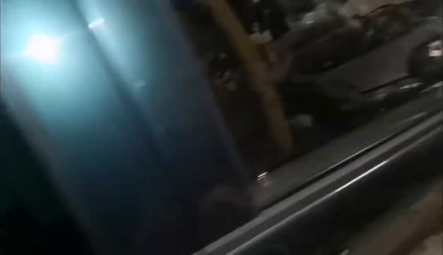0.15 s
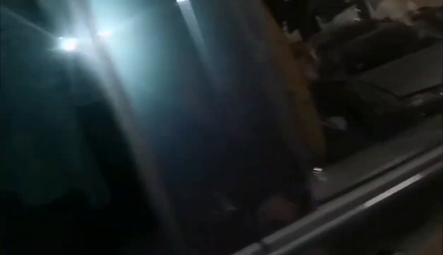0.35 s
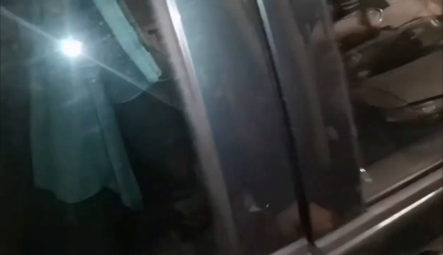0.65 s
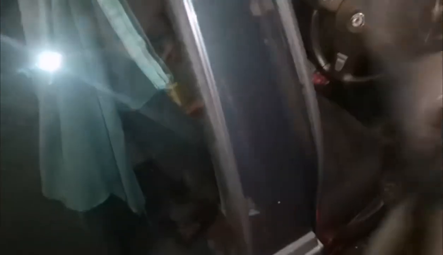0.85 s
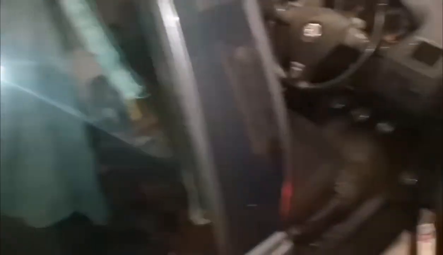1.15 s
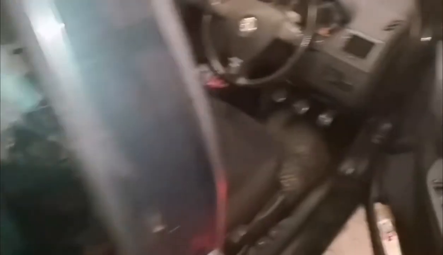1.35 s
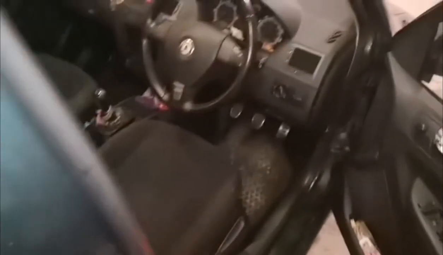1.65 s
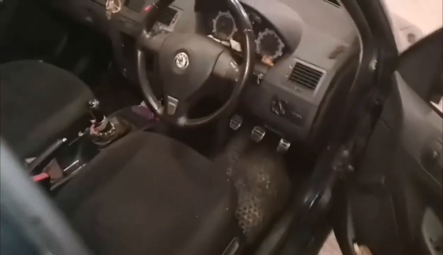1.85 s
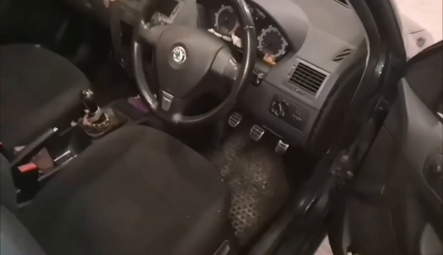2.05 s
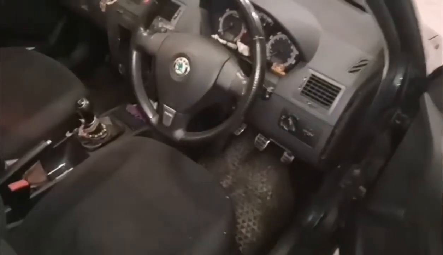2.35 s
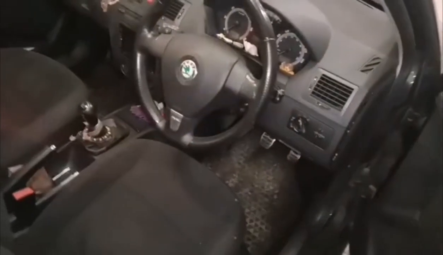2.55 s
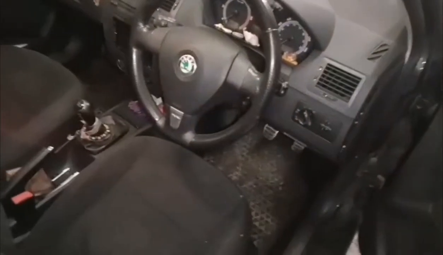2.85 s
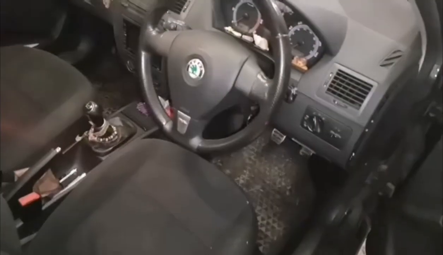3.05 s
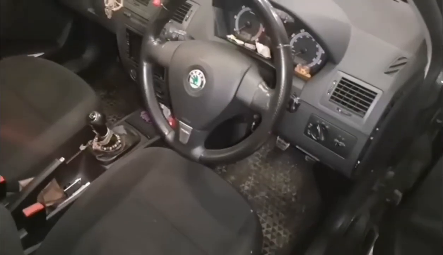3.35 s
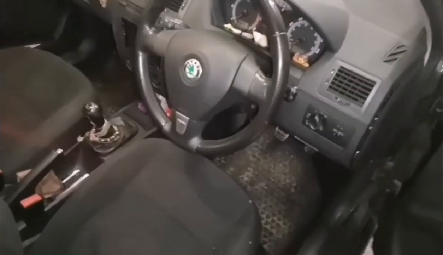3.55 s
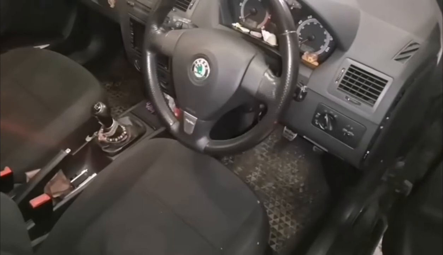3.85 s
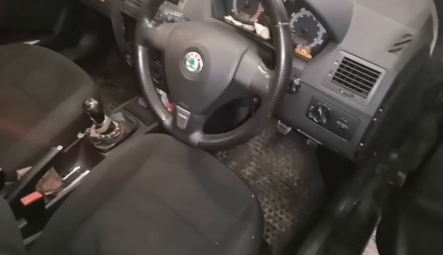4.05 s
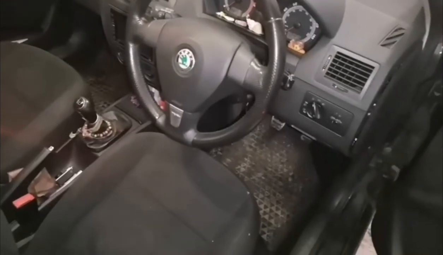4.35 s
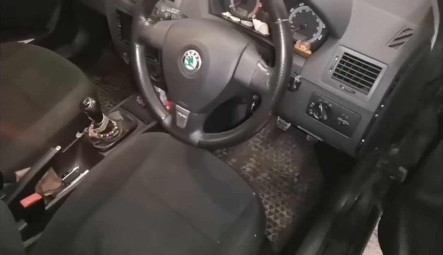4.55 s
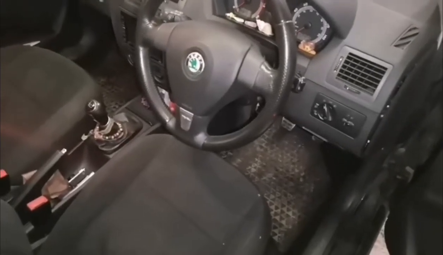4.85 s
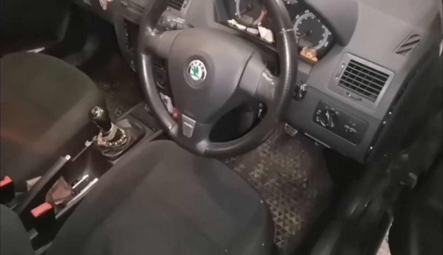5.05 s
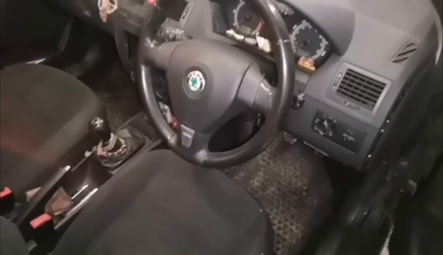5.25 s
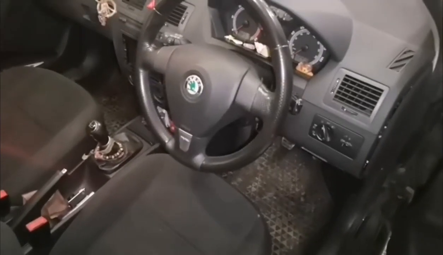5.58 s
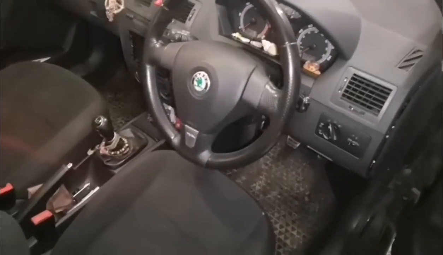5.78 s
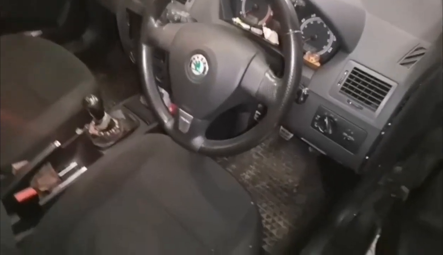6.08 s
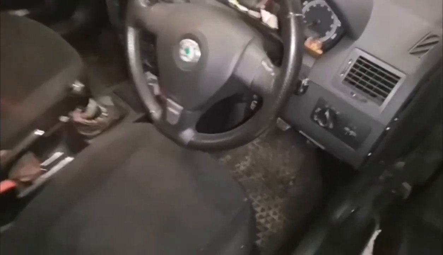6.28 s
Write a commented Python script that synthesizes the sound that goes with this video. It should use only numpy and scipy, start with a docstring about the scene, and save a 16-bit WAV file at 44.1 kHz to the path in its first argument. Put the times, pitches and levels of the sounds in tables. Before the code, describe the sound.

A handheld stereo microphone is in a quiet garage with faint rumble, hiss and short wall echoes. From the start keys jingle close by, with a small dry tick and knock at 0.1 s and bright ringing clinks until about 0.5 s. At 0.7-0.85 s the car door latch releases: a gritty clack and heavy, dull panel thump, peaking near 0.8 s, with a deep heave of cabin air and a rebound. Around 1.25 s the door stop knocks, less loudly. Soft clinks resume from 1.5 s, growing into denser jingling at 2.2-2.9 s, strongest near 2.6 s, with brief hissing cloth rubs around 2.35 and 2.9 s. Smaller jingles come at 3.4-3.6 s. Then it is almost silent, with faint plastic ticks near 4.1 s and 5.6-5.9 s. At 6.03 s one sharp, dry, loud snap rings briefly, followed by a few weak ticks.

```python
"""A bunch of keys is handled beside a car in a quiet garage: ringing clinks, dense jingling, hissing rubs on cloth.
The door latch lets go with a heavy thump and a rebound, and the door stop knocks: noise through latch resonances
over panel modes, with low heaves of the cabin air. Dry plastic ticks are noise bursts; late on something small snaps.
Two microphone ports a hand apart hear it, with random-sign wall echoes and a faint rumble and hiss."""
import sys
import numpy as np
from scipy import signal
from scipy.fft import rfft, irfft, next_fast_len
from scipy.io import wavfile
from scipy.ndimage import uniform_filter1d

SR = 44100
rng = np.random.default_rng(int(sys.argv[2]) if len(sys.argv) > 2 else 0)


def store_wav(level_fs):
    """Save 16-bit WAV to argv[1]."""
    pcm = np.round(np.clip(np.atleast_2d(level_fs), -1, 1) * 32767)
    wavfile.write(sys.argv[1], SR, pcm.T.astype(np.int16))


N = 283122

# Table levels are relative: the functions add fixed trims. Positive pan is left.

# background spectrum: (frequency [Hz], relative density [dB])
HUSH_SPECTRUM = [(8.8, -23.5), (15, 2), (126, -17.5), (169, -20), (201, -17), (294, -29), (726, -30),
                 (840, -31), (1130, -32.5), (1230, -34.5), (1790, -28.5), (3120, -36), (3940, -40.5),
                 (13400, -46.5), (16000, -50.5)]
# background likeness of the ports: (frequency [Hz], left-right correlation [-1..1])
PORT_LIKENESS = [(60, 1), (180, 0.31), (550, -0.65), (1650, -0.35), (4970, 0.18), (15000, 0.85)]
# wall echoes: (frequency [Hz], t60 [s])
GARAGE_DECAY = [(100, 0.57), (300, 0.73), (1000, 0.62), (3000, 0.54), (8000, 0.5), (14000, 0.22)]
# pushes on the cabin air: (crest time [s], level [dB], pitch [Hz], t60 [s])
HEAVES = [(0.814, -15, 37.8, 0.34), (1.048, -32, 30.8, 0.48), (1.169, -52.5, 32, 0.27),
          (1.299, -39.5, 37.8, 1.2), (1.409, -44, 30.7, 0.11), (1.508, -41, 26, 0.6),
          (1.623, -35, 42.5, 0.14), (1.791, -52.5, 40, 0.76), (1.96, -56, 39.7, 1.7)]
# blows in the door: (time [s], crack level [dB], panel level [dB], treble against crack [dB], crack length [s])
BLOWS = [(0.104, -27, -41.5, -2.5, 0.0076), (.719, -43, -32.5, -0.5, 0.046), (0.7348, -36, -39, 3.5, 0.026),
         (0.783, -30.5, -31.5, -10, 0.021), (0.7935, -13, -12.5, -9.5, 0.017),
         (.852, -17.5, -23.5, -24, 0.01367), (1.238, -41, -54.5, 9, 0.035), (1.255, -17.5, -31.5, 3, 0.013),
         (1.263, -26, -14, 10, 0.013), (2.356, -43.5, -36, -11, 0.062), (2.982, -45, -51.5, -28, 0.033),
         (3.482, -56.5, -52.5, -18, 0.018), (5.853, -52.5, -59, -18, .013)]
# latch resonances: (frequency [Hz], width of each of two passes [Hz], level [dB])
LATCH_PEAKS = [(1077, 440, -6), (1335, 370, -5.5), (1490, 380, -3.5), (1630, 220, 1), (2014, 83, -5),
               (2920, 150, -9)]
# door panel modes: (frequency [Hz], level [dB], t60 [s])
PANEL_MODES = [(86, -9, 0.11), (124, -5.5, 0.093), (159.4, 1, 0.16), (201.2, -7, 0.33), (254.6, -3.5, 0.15),
               (293.6, -5, 0.11), (412.1, -6.5, 0.08), (551, -13, 0.091), (753, -13.5, .12)]
# loose trim spectrum: (frequency [Hz], relative density [dB])
TRIM_SPECTRUM = [(150, -30), (400, 1.5), (1200, 0), (2200, -2.5), (4000, -9.5), (9000, -15), (12000, -34)]
# plastic ticks and the snap: (time [s], level [dB], low ring [Hz], high ring [Hz], high against low [dB])
TICKS = [(0.1032, -20, 1790, 7630, -8), (2.357, -49.5, 2020, 8130, -1), (3.817, -58, 2200, 7500, 2),
         (4.0174, -56, 2040, 8810, -11), (4.093, -38.5, 3217, 10600, -3.5), (4.149, -38.5, 1980, 8570, -2),
         (4.2387, -60, 2180, 7870, -6), (5.6331, -52, 1738, 8200, 1), (5.677, -60.5, 1700, 7400, -12),
         (5.836, -59.5, 2540, 7390, -8.5), (5.858, -49, 1697, 7220, 1), (5.893, -55.5, 3000, 6960, -16.5),
         (5.9866, -52, 2150, 7930, 11.5), (6.0307, -4, 3320, 8970, -3), (6.2472, -61.5, 2300, 7640, -10),
         (6.2912, -63, 3530, 7670, -2.5), (6.323, -44.5, 3380, 5600, -14.5), (6.3977, -37.5, 4300, 6100, 4)]
# tick and snap burst spectrum: (frequency [Hz], relative density [dB])
SNAP_SPECTRUM = [(140, -69), (240, -42), (945, -20), (1660, -9), (2320, -12), (3290, -5), (4700, -4),
                 (7300, -4), (8960, -3), (13900, -20), (16000, -42)]
# keys and hand on cloth: (start [s], level [dB], rise [s], hold [s], bass against level [dB])
RUBS = [(2.342, -35, 0.015, 0.044, -12), (2.851, -39, 0.091, 0.1, -23.5), (5.537, -78.5, 0.054, .37, -15),
        (6.278, -68.5, 0.0096, 0.16, -22.5)]
# cloth hiss spectrum: (frequency [Hz], relative density [dB])
CLOTH_SPECTRUM = [(290, -40), (500, -14.5), (988, 1.5), (1180, -3.5), (1950, 8), (2430, 5.5), (3440, -1),
                  (7860, 9.5), (10500, -0.5), (14900, -9.5), (16000, -42)]
# swings of the bunch: (start [s], level [dB], rise [s], hold [s], t60 [s], treble against level [dB], pan [dB])
SHAKES = [(-.1, -40.5, 0.14, 0.13, 0.27, -22, -4), (0.066, -34.5, 0.039, 0.06, 1, -11.5, 8.5),
          (0.379, -53.5, 0.005, 0.015, 1, -21, 8), (1.52, -52, 0.028, 0.21, 0.25, -8, 1.5),
          (1.841, -41.5, 0.013, 0.0074, 0.48, 4, -1.5), (2.211, -41, 0.059, 0.0083, 0.57, 0, 4),
          (2.41, -46.5, .012, 0.009, 1, -13, -1.5), (2.538, -37.5, 0.063, .25, 0.17, -8, 2.5),
          (2.799, -34, 0.024, .005, 0.052, 2, 1), (3.247, -51, .12, 0.0086, 0.047, -10, 1),
          (3.402, -43, 0.038, 0.15, 0.22, -12, 3.5), (3.926, -60.5, 0.073, .01, 0.18, -17, 5)]
# resonances heard when keys ring, with a short-lived cluster near 7.2 kHz that is probably the microphone's:
# (frequency [Hz], level [dB], t60 before any extra damping [s])
RESONANCES = [(2020, -14, .06), (3550, -18, .08), (4130, -22, .3), (4920, -20, .4), (5450, -16, .12),
              (6105, -12, .15), (6325, -12, .8), (6660, -10, .2), (7106, -2, .14), (7214, 0, .25),
              (7310, -2, .12), (7434, -5, .2), (7700, -8, .15), (7950, -9, .15), (8398, -8, .35),
              (8580, -10, .5), (8963, -12, .15), (9600, -12, .2), (10090, -12, .25), (10780, -10, .22),
              (11160, -10, .15), (11422, -6, .45), (12100, -8, .22), (13080, -10, .24), (13530, -14, .3),
              (13935, -10, .45), (14350, -10, .4), (14850, -6, .1)]
# key contact noise spectrum: (frequency [Hz], relative density [dB])
CONTACT_SPECTRUM = [(350, -77), (600, -46.5), (1410, -22), (1880, -6), (4400, -19.5), (6550, -5.5),
                    (7210, -5.5), (7830, -6), (10000, -19.5), (11800, -19.5), (13900, -23), (15400, -17),
                    (16000, -24.5)]
# key on key: (time [s], level [dB], loudest low resonance [Hz], loudest high resonance [Hz],
#              high against low [dB], free ring until damped [s])
CLINKS = [(0.0269, -39, 7950, 9600, -12, 0.023), (0.079, -41, 7434, 10780, 0, .1),
          (0.1042, -28.5, 7106, 14350, 1, .13), (0.124, -28.5, 7434, 14850, -11, 0.11),
          (.1354, -18, 7214, 9600, -11, .3), (0.189, -31, 7310, 12100, -6, .12),
          (0.2204, -32.5, 7214, 9600, -20, 0.1), (0.2627, -32.5, 7214, 11422, -7, 0.04),
          (0.2887, -39.5, 7214, 11422, -25, 0.098), (.398, -28.5, 7310, 9600, -19, 0.072),
          (0.4043, -29, 7434, 9600, -23, 0.042), (0.4392, -28, 7106, 10090, -14, 0.079),
          (0.4873, -33, 7214, 9600, -25, 0.15), (0.508, -39, 7214, 10090, -21, .07),
          (1.5372, -43.5, 7106, 11422, 2.5, 0.087), (1.574, -44, 7214, 11422, -2.5, 0.025),
          (1.687, -39.5, 8963, 10090, -2.5, 0.031), (1.72, -29, 7310, 10090, -6.5, 0.015),
          (1.806, -47, 7310, 14850, -11, .07), (1.8488, -38, 8580, 11422, -1, 0.13),
          (1.8769, -36.5, 6660, 11422, 0, 0.12), (1.862, -46, 4920, 10780, -4, 0.33),
          (1.9227, -44.5, 7310, 11422, 4, 0.086), (2.0045, -46.5, 7310, 11422, -4, 0.092),
          (2.0966, -62.5, 7310, 11422, -1, 0.13), (2.176, -44, 7434, 12100, -8.5, 0.14),
          (2.24, -49.5, 4920, 13080, 11, 0.14), (2.2459, -36, 6660, 14350, 11, 0.068),
          (2.2636, -27, 8398, 14350, -0.5, .28), (2.4224, -34.5, 7310, 11422, -29, .07),
          (2.4907, -39.5, 7106, 14850, -1.5, .04), (2.573, -31, 7310, 9600, -9, .07),
          (2.614, -20, 7106, 14850, -3, .14), (2.6311, -21, 7310, 14850, 7, 0.015),
          (2.7014, -38.5, 7950, 11422, 11, 0.34), (2.7261, -26.5, 7310, 11422, -28, 0.085),
          (2.7387, -32.5, 8398, 13935, -20, 0.032), (2.7534, -31.5, 6325, 13935, 3, 0.094),
          (2.8255, -41.5, 6325, 10780, 20, 0.016), (2.902, -44, 7106, 12100, 9, 0.11),
          (3.3, -60, 3550, 11422, -2, 0.048), (3.365, -51, 7310, 12100, -22, 0.1),
          (3.409, -49, 7106, 9600, -27, 0.11), (3.444, -31, 7106, 10090, -5.5, .1),
          (3.4586, -35.5, 7106, 13080, -3, .08), (3.497, -43, 2020, 13935, -13, .09),
          (3.528, -38, 6325, 11422, 2.5, 0.025), (3.5747, -49.5, 5450, 13935, 3, 0.027),
          (3.6025, -39, 8580, 10780, 0.5, 0.027), (3.6177, -51, 8580, 10780, -10, 0.083),
          (3.9762, -56.5, 7434, 11422, -25, 0.11)]

HUSH_DB, PATCHY_DB = -64, 1.4
HEAVE_RISE_S = 0.03
PANEL_SPREAD_DB = 2.5  # random spread of the panel mode levels from blow to blow
DOOR_PAN_DB, TICKS_PAN_DB, TREBLE_PAN_DB = 0, 1.5, -5.5
RATTLE_DB = -29.5  # rattle behind a 0 dB tick
RATTLE_SLOPE = 0.36  # dB the rattle gains on its tick per dB the tick is weaker
LIFT_T60_S, SCRAPE_T60_S = 0.041, 0.045
SPLIT_HZ, HIGH_RINGS_HZ, EDGE_HZ = 9000, 9300, 15900
DAMPED_SAMPLES, CONTACT_SAMPLES = 6000, 2048
LAG_SAMPLES = 14  # left port after right


def amp(db):
    """Decibels to gain."""
    return 10 ** (np.asarray(db) / 20)


def evened(x):
    """Scales to rms 1."""
    return x / np.sqrt(np.mean(x ** 2) + 1e-20)


def read(points, hz):
    """Reads a frequency table at hz, interpolating over log frequency."""
    f, value = np.transpose(points)
    return np.interp(np.log(hz + 1), np.log(f + 1), value)


def tinted(x, points):
    """Filters x by a spectrum table; white noise of rms 1 keeps about that rms."""
    size = next_fast_len(x.shape[-1])
    gain = amp(read(points, np.fft.rfftfreq(size, 1 / SR)))
    return irfft(rfft(x, size) * evened(gain), size)[..., :x.shape[-1]]


def band(x, lo_hz, hi_hz):
    """Band-pass to rms 1."""
    sos = signal.butter(4, [lo_hz, hi_hz], "band", fs=SR, output="sos")
    return evened(signal.sosfilt(sos, x))


def split(x, hz):
    """The parts of x below and above hz."""
    low = signal.sosfiltfilt(signal.butter(4, hz, fs=SR, output="sos"), x)
    return low, x - low


def resonate(x, hz, width_hz):
    """A steep resonance: one peak filter passed twice."""
    peak = signal.iirpeak(hz, hz / width_hz, SR)
    return signal.lfilter(*peak, signal.lfilter(*peak, x))


def rings(modes, seconds):
    """One exponentially dying sine per mode, t60 held to 0.01-0.8 s."""
    t = np.arange(round(seconds * SR)) / SR
    hz, db, t60 = np.transpose(modes)[:, :, None]
    return t, amp(db - 60 * t / np.clip(t60, .01, .8)) * np.sin(2 * np.pi * hz * t)


def swell(start, rise, hold, t60):
    """Gain at every sample: enters at -30 dB, climbs to 0 dB, holds, dies away."""
    t = np.arange(N) / SR - start
    climb_db = -30 * np.clip(1 - t / max(rise, .002), 0, 1)
    fall_db = -60 * np.maximum(t - rise - hold, 0) / max(t60, .01)
    return (t > 0) * amp(climb_db + fall_db)


def sides(pan_db):
    """Left and right gains."""
    return amp(np.array([pan_db / 2, -pan_db / 2]))


def add(mix, s, sound):
    """Mixes a stereo sound in at time s."""
    part = mix[:, round(s * SR):][:, :sound.shape[1]]
    part += sound[:, :part.shape[1]]


def hush():
    """Distant rumble and hiss: shaped noise, gently patchy in time and pitch, part-correlated between ports."""
    frames, hz = N // 256 + 5, np.fft.rfftfreq(1024, 1 / SR)
    a, b, c, d, patches = rng.standard_normal((frames, 513, 5)).T
    patches = evened(uniform_filter1d(uniform_filter1d(patches, 14, 0), 10, 1))
    same = np.clip(read(PORT_LIKENESS, hz), -1, 1)[:, None]
    left, other = a + 1j * b, c + 1j * d
    spectra = np.array([left, same * left + np.sqrt(1 - same ** 2) * other])
    spectra *= amp(read(HUSH_SPECTRUM, hz)[:, None] + PATCHY_DB * patches)
    noise = signal.istft(spectra, nperseg=1024, noverlap=768)[1][:, :N]
    return amp(HUSH_DB) * evened(noise)


def garage(x):
    """Wall echoes of random sign, each band dying at its own speed."""
    taps = np.zeros((2, SR))
    at = np.arange(300, SR - 20, 20) + rng.integers(0, 20, (2, (SR - 301) // 20))
    np.put_along_axis(taps, at, rng.choice([-1., 1.], at.shape), 1)
    hz, t, z = signal.stft(taps, SR, nperseg=256)
    decay = amp(-60 * t / read(GARAGE_DECAY, hz)[:, None])
    tail = signal.istft(z * decay, SR, nperseg=256)[1]
    low = signal.lfilter(*signal.butter(2, 350, fs=SR), tail)
    tail = tail - low + low[0]  # long waves reach both ports alike
    return signal.fftconvolve(x, tail / np.linalg.norm(tail[0]), axes=1)[:, :N]


def boom():
    """Cabin air heaves at a low pitch while the door swings; weaker pushes are less tonal, more buffeting."""
    t, out = np.arange(N) / SR, np.zeros(N)
    buffet = band(rng.standard_normal(N), 25, 110)
    for crest, db, hz, t60 in HEAVES:
        tuned = np.clip((db + 56) / 18, 0, .93)
        tone = np.sqrt(2) * np.cos(2 * np.pi * hz * (t - crest))
        push = amp(db) * swell(crest - HEAVE_RISE_S, HEAVE_RISE_S, .02, t60)
        out += push * (tuned * tone + np.sqrt(1 - tuned ** 2) * buffet)
    return out * np.ones((2, 1))


def door():
    """Each blow grinds through the latch for some ms, spits a little treble and sets the panel ringing."""
    t, panel = rings(PANEL_MODES, .5)
    panel = panel * (1 - np.exp(-t / 0.0038))  # the big sheet takes a moment to move
    out = np.zeros((2, N))
    chance = rng.standard_normal((len(BLOWS), len(PANEL_MODES)))
    noise = rng.standard_normal((len(BLOWS), 3, len(t)))
    for (s, db, panel_db, treble_db, length), luck, n in zip(BLOWS, chance, noise):
        progress = np.minimum(t / length, 1)
        blow = np.sin(np.pi * progress ** .6)
        drive = (n[0] + 1.3 * n[1:]) * blow  # a wide source: the ports hear it only partly alike
        metal = sum(amp(d) * resonate(drive, hz, width) for hz, width, d in LATCH_PEAKS)
        hiss = amp(-8.5) * band(n[1:], 350, 4500) + amp(treble_db - 7.5) * band(n[1:], 2800, 9500)
        # loose trim rattles on
        trim = amp(-20.5 - 60 * t / 0.43) * progress * tinted(n[:0:-1], TRIM_SPECTRUM)
        crack = amp(10) * metal + hiss * blow + trim
        flutter = 1 + .5 * band(n[0], 13, 120)  # loose parts
        body = amp(panel_db - 2.5) * amp(PANEL_SPREAD_DB * luck) @ panel * flutter
        add(out, s, amp(db) * sides(DOOR_PAN_DB)[:, None] * crack + body)
    return out


def ticks():
    """Ticks and snap: a noise burst of 8 ms t60 with two short rings and a rattle behind."""
    out = np.zeros((2, N))
    noise = tinted(rng.standard_normal((len(TICKS), 3, 4096)), SNAP_SPECTRUM)
    for (s, db, low_hz, high_hz, high_db), n in zip(TICKS, noise):
        t, ring = rings([(low_hz, -9, .01), (high_hz, high_db - 3.0, .01)], 4096 / SR)
        snap = amp(-2 - 60 * t / .008)
        rattle = amp(RATTLE_DB - RATTLE_SLOPE * db - 60 * t / .09)
        burst = (n[0] + 1.1 * n[1:]) * (snap + rattle)
        onset = 1 - np.exp(-(t / .0008) ** 3)
        add(out, s, amp(db) * sides(TICKS_PAN_DB)[:, None] * (ring.sum(0) + burst) * onset)
    return out


def rubs():
    """Threads slip in a dense, slightly grainy hiss over a low push."""
    grain = amp(2.5 * evened(uniform_filter1d(rng.standard_normal(N), 160)))
    shared, apart = rng.standard_normal(N), rng.standard_normal((2, N))
    hiss = evened(tinted(shared + 1.2 * apart, CLOTH_SPECTRUM) * grain)
    push = band(rng.standard_normal(N), 140, 310)
    out = np.zeros((2, N))
    for start, db, rise, hold, bass_db in RUBS:
        out += swell(start, rise, hold, LIFT_T60_S) * amp(db) * (hiss + amp(bass_db) * push)
    return out


def jingle():
    """About 800 tiny ticking contacts a second; about half of them set a short resonance ringing."""
    t, ring = rings([(hz, db, min(.6 * t60, .08)) for hz, db, t60 in RESONANCES], .12)
    hits = rng.random(N) < 800 / SR
    size = amp(3.6 * np.minimum(rng.exponential(1, N), 3)) * hits
    which = rng.integers(0, 2 * len(RESONANCES), N)  # the upper half of the numbers rings nothing
    tones = sum(signal.oaconvolve(size * (which == k), ring[k])[:N] for k in range(len(RESONANCES)))

    spread = np.sqrt(signal.lfilter([1], [1, -np.exp(-1 / (0.002 * SR))], size ** 2))
    noise = rng.standard_normal(N) + 1.1 * rng.standard_normal((2, N))
    contacts = tinted(noise, CONTACT_SPECTRUM) * spread
    dull, bright = split(evened(tones) + amp(-2) * evened(contacts), SPLIT_HZ)

    level, treble = np.zeros(N), np.zeros(N)
    for start, db, rise, hold, t60, treble_db, pan_db in SHAKES:
        shake = amp(db - 7.5) * swell(start, rise, hold, t60)
        level += shake
        treble += amp(treble_db) * shake
    return level * evened(dull) + treble * evened(bright)


def clinks():
    """Each contact scrapes in, rings two resonances freely until damped, and rattles all of them, dying sooner."""
    t, ring = rings([(hz, 0, t60) for hz, db, t60 in RESONANCES], .35)
    hz, ring_db, t60 = np.transpose(RESONANCES)
    out = np.zeros((2, N))
    chance = rng.standard_normal((len(CLINKS), 4, len(RESONANCES)))
    contact = tinted(rng.standard_normal((len(CLINKS), CONTACT_SAMPLES)), CONTACT_SPECTRUM)
    dull, bright = split(contact, SPLIT_HZ)
    # touching neighbours make the ring flutter
    rattles = uniform_filter1d(rng.standard_normal((len(CLINKS), DAMPED_SAMPLES)), 180)
    onset = 1 - np.exp(-(t / .002) ** 2)
    scrape_db = -8 - 60 * t[:CONTACT_SAMPLES] / SCRAPE_T60_S
    for clink, luck, low, high, rattle in zip(CLINKS, chance, dull, bright, rattles):
        s, db, low_hz, high_hz, high_db, free_s = clink
        loose = np.zeros(len(RESONANCES))
        loose[np.argmin(abs(hz - low_hz))] = amp(-3)
        loose[np.argmin(abs(hz - high_hz))] = amp(-6.5 + high_db)
        port_gain = amp(3.5 * luck[1:3])  # random for each resonance and port
        damping = np.exp(-(t / max(free_s, .005)) ** 3) * (.5 + .5 * amp(-60 * t / .08))
        sound = (loose * port_gain) @ ring * damping

        # the damped ring varies randomly in pitch and level and dies sooner
        damped_modes = np.transpose([hz * (1 + .007 * luck[3]), ring_db + 4 * luck[0], 1 / (1 / t60 + 1 / .16)])
        damped_gain = port_gain * amp(-13 + high_db * (hz > HIGH_RINGS_HZ))
        damped = damped_gain @ rings(damped_modes, DAMPED_SAMPLES / SR)[1]
        sound[:, :DAMPED_SAMPLES] += damped * (1 + .6 * evened(rattle))
        sound[:, :CONTACT_SAMPLES] += amp(scrape_db) * (low + amp(7.5 + high_db) * high)
        add(out, s - .0005, amp(db) * sound * onset)
    return out


def dangling(keys):
    """The bunch drifts between the ports from swing to swing; its treble leans steadily right."""
    dull, bright = split(keys, SPLIT_HZ)
    swings = np.transpose(SHAKES)
    pan_db = np.interp(np.arange(N) / SR, swings[0] + swings[2], swings[-1])
    return dull * sides(pan_db) + bright * sides(TREBLE_PAN_DB)[:, None]


def scene():
    """Keys hang between the ports; door, cabin air and ticks reach the right port first; walls answer all but air."""
    keys = dangling(clinks() + jingle()) + rubs()
    car, clicks = door(), ticks()
    right = car + clicks + boom()
    right = np.array([np.roll(right[0], LAG_SAMPLES), right[1]])
    echoes = garage(amp(-17.5) * keys + amp(-15) * car + amp(-22.5) * clicks)
    return keys + right + echoes + hush()


def record(dry):
    """Band limit: linear-phase low-pass."""
    lowpass = signal.firwin(255, EDGE_HZ, window=("kaiser", 9), fs=SR)
    return signal.oaconvolve(dry, lowpass[None], "same")


dry = scene()
out = record(dry)
store_wav(out)
```